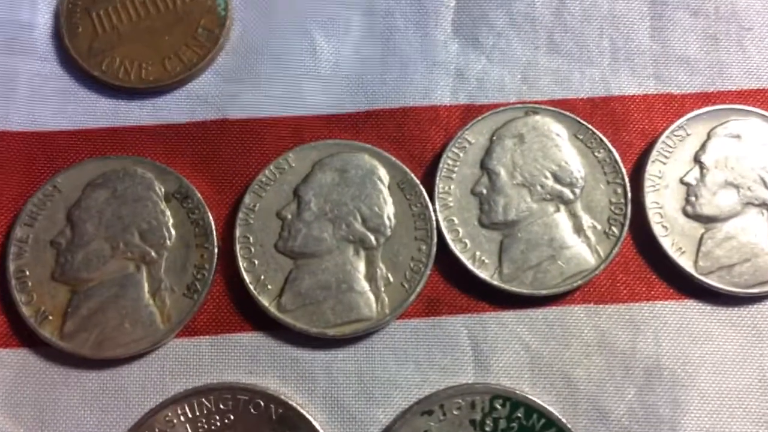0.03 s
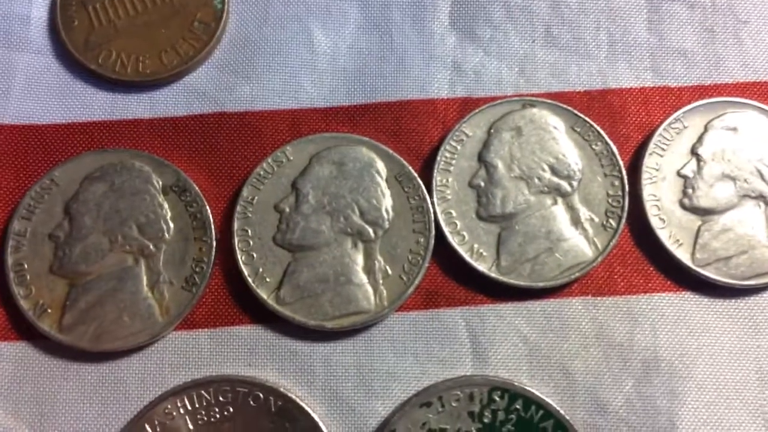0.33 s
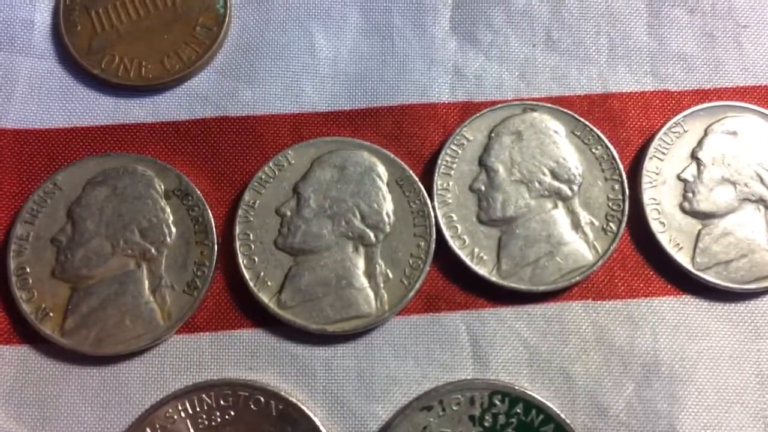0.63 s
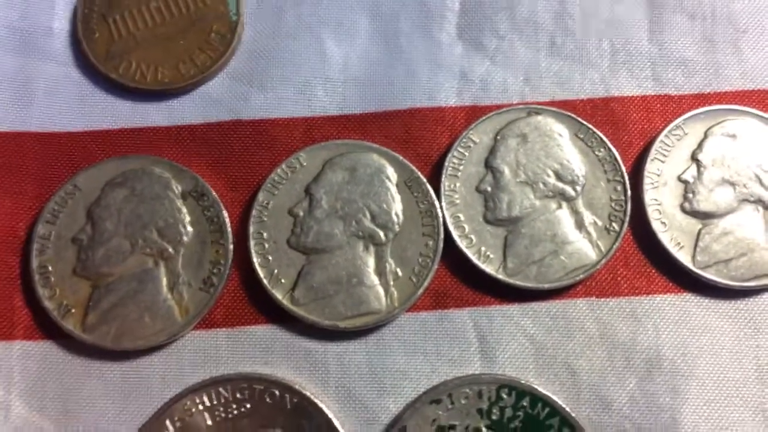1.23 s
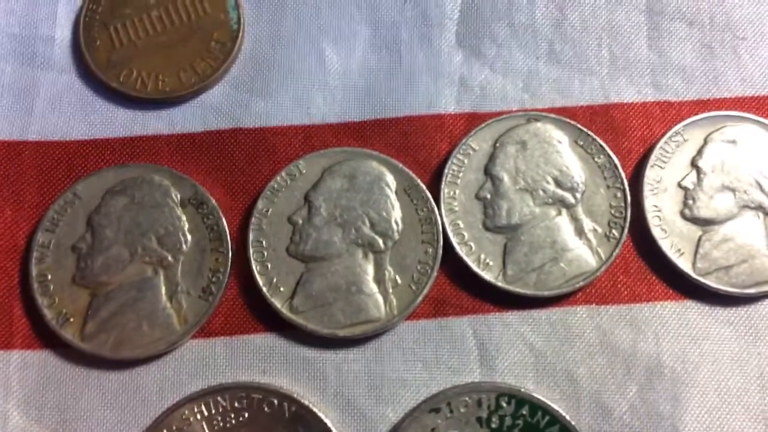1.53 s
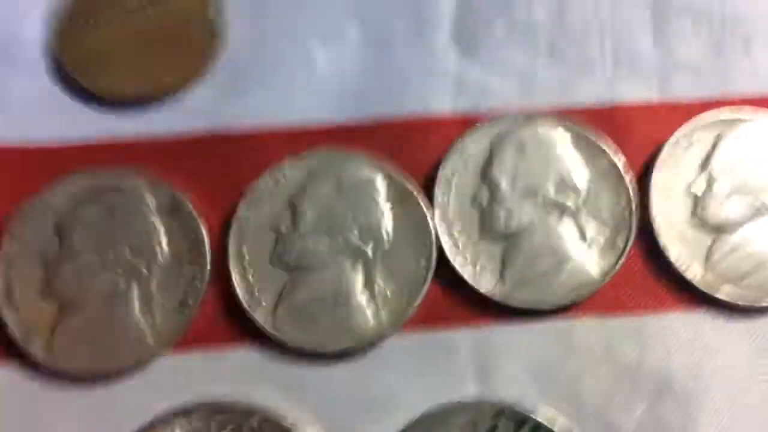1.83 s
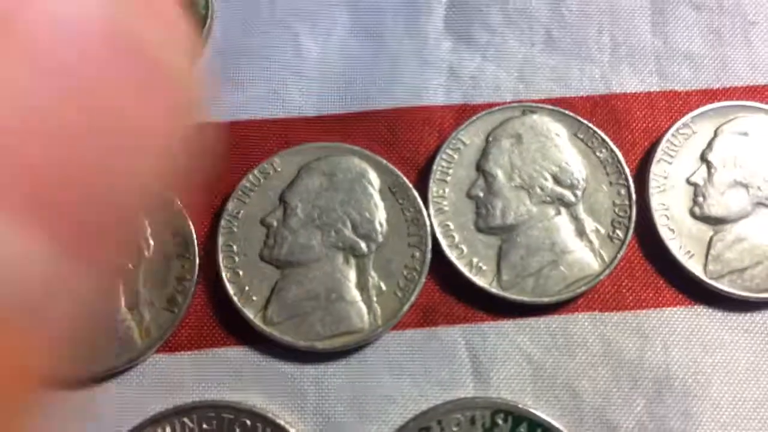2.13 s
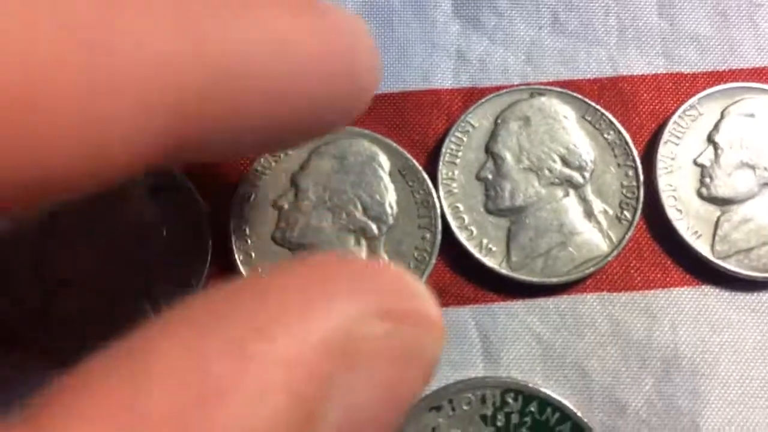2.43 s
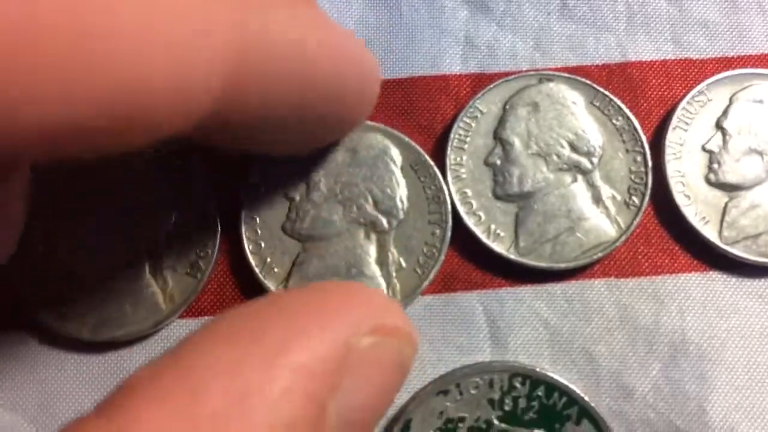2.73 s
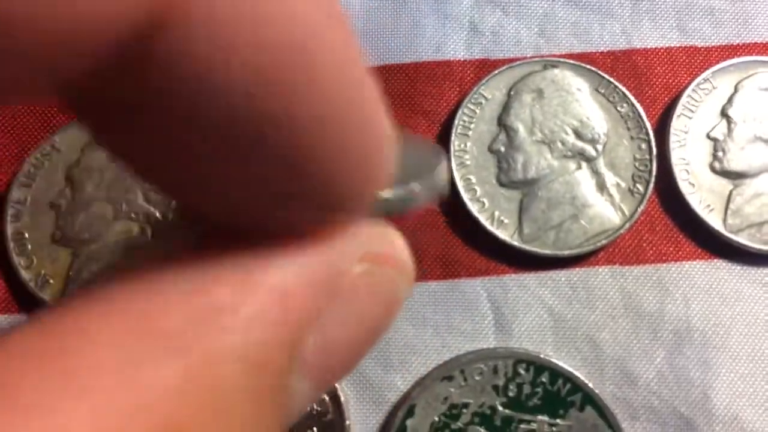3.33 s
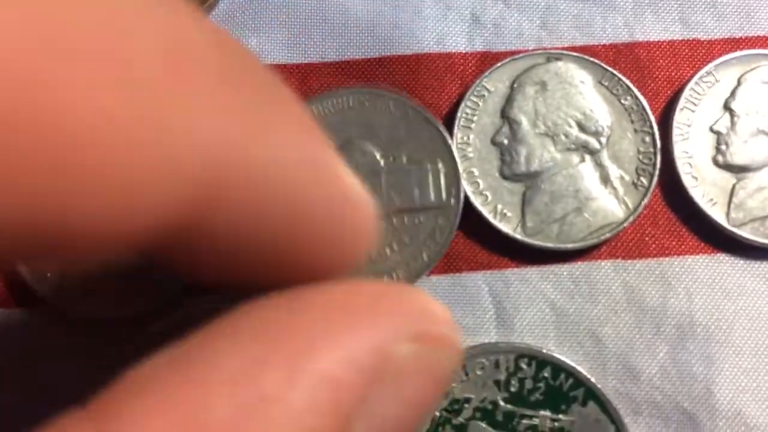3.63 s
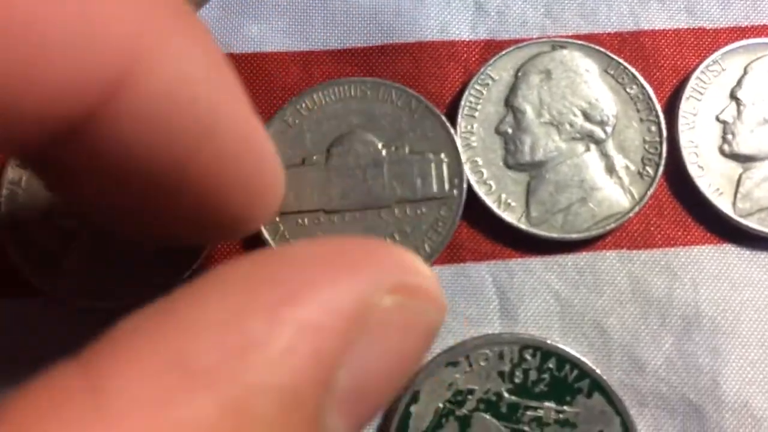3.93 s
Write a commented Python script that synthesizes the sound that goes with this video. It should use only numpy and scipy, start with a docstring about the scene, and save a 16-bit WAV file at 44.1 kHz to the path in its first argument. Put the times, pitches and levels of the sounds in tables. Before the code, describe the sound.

A coin is turned over on cloth, knocking and clicking against another coin.

```python
"""A quiet room hisses and hums while, close by, fingers turn a coin over on a cloth-covered table.
First come a few faint taps of the hand, brushes of skin on cloth and one small metallic ting.
After about 3.3 seconds the coin bumps and drags, and its rim knocks on the table through the cloth.
Then it clicks twice against the next coin, chatters and rings very high. A last faint ting follows."""
import sys
import numpy as np
from scipy import signal
from scipy.fft import rfft, irfft
from scipy.io import wavfile
from scipy.ndimage import uniform_filter1d, minimum_filter1d

SR = 44100
rng = np.random.default_rng(int(sys.argv[2]) if len(sys.argv) > 2 else 0)


def generate_wav(sig):
    """Save sig (samples, or channels by samples) to the path in sys.argv[1] as 16-bit PCM at SR."""
    pcm = np.round(np.clip(np.atleast_2d(sig).T, -1, 1) * 32767).astype(np.int16)
    wavfile.write(sys.argv[1], SR, pcm)


N = 176400
T = np.arange(N) / SR

# The tone of the room's hiss. Each row: frequency in Hz, relative level in dB.
HISS_SPECTRUM = [(20, -34.5), (45, -13), (90, -13), (130, -11), (160, -14.5), (250, -5.5), (330, -6.5),
                 (470, -10.5), (600, -9.5), (800, -9.5), (1120, -10.5), (1500, -17.5), (2050, -21),
                 (3100, -23), (3950, -30.5), (7700, -35.5), (8600, -38), (12000, -41.5), (15200, -52)]
# The hiss sinks a little as the hand covers the coins. Each row: time in seconds, change in dB.
HISS_CHANGE = [(0, -0.1), (.8, -0.14), (1.1, .5), (1.6, 0.5), (2.2, -0.3), (2.75, -0.06), (3.3, 0.5),
               (4, -1.6)]
# The low murmur of the room's air. Each row: time in seconds, level in dB.
MURMUR_LEVEL = [(0, -56.5), (.85, -57), (1.02, -53), (1.42, -49.5), (1.56, -47), (1.70, -51.5), (2.1, -59),
                (2.35, -50.5), (2.75, -59.5), (3.02, -52.5), (3.25, -58), (4, -59.5)]
# The pitches in that murmur. Each row: frequency in Hz, width in Hz, relative level in dB.
MURMUR_BANDS = [(205.2, 17.4, 1.5), (288.4, 38, 0), (353, 31, -11.5), (131.3, 29.3, -11.5)]
# The room's steady drones. Each row: frequency in Hz, width in Hz, level in dB.
DRONE_BANDS = [(208.6, 8.8, -64), (349.8, 17, -64), (512.6, 11, -64), (717.6, 32, -66), (866.7, 20, -64)]
# How the lowest hum swells and fades. Each row: time in seconds, relative level in dB.
HUM_SWELL = [(0, -76), (.35, -75), (.7, -62.5), (1.4, -57.5), (2.0, -60.5), (2.6, -55), (3.1, -58),
             (3.4, -60), (4, -62)]
# Dry taps of the hand. Each row: start in seconds, level in dB, seconds to fade to about a third.
HAND_TAPS = [(0.778, -57.5, 0.0069), (2.392, -58, .005), (3.475, -51.5, 0.0029)]
# The tone of a tap. Each row: frequency in Hz, relative level in dB.
TAP_SPECTRUM = [(500, -11), (3000, -3), (5300, -4), (7500, -7), (15000, -22)]
# Skin brushes cloth and coin. Each row: middle in seconds, half length in seconds, level in dB.
SKIN_BRUSHES = [(1.66, 0.077, -72), (1.801, 0.015, -66), (2.083, 0.013, -66), (3.035, .004, -68),
                (3.33, .018, -70), (3.555, 0.0014, -53), (3.625, .004, -58.5), (3.675, 0.0011, -51)]
# The tone of a brush. Each row: frequency in Hz, relative level in dB.
BRUSH_SPECTRUM = [(500, -17), (3000, 0.5), (5500, -3), (9000, -3), (12500, -5.5), (14400, -10),
                  (15500, -23)]
# Faint metallic tings. Each row: start in seconds, gain in dB.
TING_EVENTS = [(2.408, -56.5), (3.945, -62)]
# A ting's modes, the notes it rings with. Ring time is how long a note takes to fade by 60 dB.
# Each row: frequency in Hz, relative level in dB, ring time in seconds.
TING_MODES = [(3330, 2.5, 0.17), (4300, -7, .09), (7720, -12, .22), (7860, -6, .09)]
# Soft bumps on the table. Each row: middle in seconds, half length in seconds, level in dB.
SOFT_BUMPS = [(3.336, 0.0077, -44), (3.645, .004, -38)]
# The rims rub together. Each row: middle in seconds, half length in seconds, level in dB.
RIM_RUBS = [(3.338, .012, -70), (3.567, .007, -59)]
# The coin drags on cloth. Each row: middle and half length in seconds, level in dB, pitch in Hz.
CLOTH_SCUFFS = [(3.340, 0.0085, -48.5, 730), (3.511, 0.011, -42.5, 330), (3.558, 0.015, -48.5, 653),
                (3.591, 0.0052, -45.5, 600), (3.643, 0.0037, -41.5, 740), (3.662, .006, -52, 760)]
# The rim hits the table. Each row: start in seconds, thud and clatter levels in dB,
# the clatter's centre in Hz, its width in octaves.
RIM_KNOCKS = [(3.476, -21, -39.5, 1397, 0.74), (3.5769, -19.5, -25, 2880, 0.79),
              (3.686, -24.5, -23, 1840, 0.58)]
# The table's notes. Each row: frequency in Hz, relative level in dB, ring time in seconds.
TABLE_MODES = [(265, -11.5, 0.031), (340, -3, 0.031), (528, -5.5, 0.038), (717, 0.5, 0.032),
               (790, -4.5, 0.044), (1067, 1, 0.013), (1320, -3.5, .013), (1790, 1, 0.018)]
# Coin hits coin. Each row: start in seconds, tick level in dB, clack level in dB.
COIN_CLICKS = [(3.5722, -13, -43), (3.5743, -17, -48), (3.5772, -11.5, -19.5), (3.5773, -23.5, 3.5),
               (3.6150, -23, -53), (3.6163, -16, -49.5), (3.6853, -13, -26.5), (3.6867, -2.5, -15),
               (3.6988, -7.5, -30), (3.7001, -22, -50), (3.702, -18, -50.5), (3.7056, -30, -59),
               (3.7080, -26, -59.5), (3.7085, -25, -55), (3.7098, -18.5, -52), (3.712, -23, -58.5)]
# The tone of a tick. Each row: frequency in Hz, relative level in dB.
TICK_SPECTRUM = [(100, -50), (600, -28), (2000, -28), (4100, -23.5), (5100, -11), (6700, -6), (8500, 2.5),
                 (10000, 0), (11300, -5.5), (13000, -3), (15000, -12), (15700, -33.5)]
# The notes of two coins pressed together, of the turned coin (main and lower) and of its neighbour.
# Each row: frequency in Hz, relative level in dB, ring time in seconds.
CLACK_MODES = [(2450, -15, .005), (3260, -13, 0.0056), (4040, -19.5, 0.0045), (5420, -16, .007),
               (7800, -5.5, 0.0055), (8220, -8, 0.005), (9600, -22.5, .004), (12570, -0.5, 0.004),
               (13250, -10.5, .003)]
COIN_MODES = [(13960, -15, .15), (14082, -18, .11), (14160, -8, .36), (14200, -1, .2), (14228, -13, .18)]
COIN_LOW_MODES = [(13605, -19, .07), (13754, -7, .08), (13824, -2, .08)]
NEIGHBOUR_MODES = [(14524, 0, .06), (14470, -12, .04), (14700, -17, .035)]
# The coins ring after a contact. Each row: start, rise time and time left free in seconds,
# then gains in dB for the turned coin's main notes, its lower notes and the neighbour's notes.
FREE_RINGS = [(3.5727, 0.00102, 0.043, -24.5, -26, -36), (3.5800, .006, 0.064, -24, -27, -7),
              (3.6020, .0042, .02, -22, -35, -43), (3.6320, 0.0046, .045, -37, -43, -50),
              (3.6864, 0.0066, 0.012, -8.5, -5.5, -14), (3.7060, .006, .02, -18.5, -35, -40.5),
              (3.7500, .007, 0.012, -32, -52, -61), (3.7800, .006, .3, -50, -64, -70)]
# The tone of the room's echo. Each row: frequency in Hz, level in dB.
ECHO_SPECTRUM = [(200, -9.5), (500, -6.5), (800, -11.5), (3000, -9), (6000, -22.5), (10000, -23.5),
                 (14000, -21.5)]
# How long the echo lasts. Each row: frequency in Hz, ring time in seconds.
ECHO_RING_TIMES = [(200, 0.32), (1000, 0.16), (4000, 0.21), (14000, .13)]


def amp(db):
    """Turns decibels into a number to multiply by."""
    return 10 ** (np.asarray(db) / 20)


def unit(x):
    """Scales a sound to an average power of 1."""
    return x / np.sqrt(np.mean(x ** 2) + 1e-20)


def at_hz(table, hz):
    """Looks up a table by frequency, gliding between its rows."""
    row_hz, value = np.transpose(table)
    return np.interp(np.log(hz + 1), np.log(row_hz + 1), value)


def over_time(table):
    """Joins a table's points into a curve over time."""
    return np.interp(T, *np.transpose(table))


def add(mix, start, sound):
    """Mixes a sound in at a start time in seconds."""
    part = mix[round(start * SR):][:len(sound)]
    part += sound[:len(part)]


def noise(gain, size=N):
    """Noise whose tone is shaped by gain(hz)."""
    hz = np.fft.rfftfreq(size, 1 / SR)
    return unit(irfft(rfft(rng.standard_normal(size)) * gain(hz), size))


def hill(distance, steepness=2):
    """A curve that is 1 at distance 0 and one half at distance 1."""
    return 1 / (1 + distance ** steepness)


def swells(table):
    """A smooth rise and fall for each row."""
    return sum(amp(db) * np.exp(-.5 * ((T - middle) / half) ** 2) for middle, half, db in table)


def modes(table):
    """A struck object rings as a sum of fading pure tones."""
    t = T[:SR // 2]
    return sum(amp(db) * np.exp(-np.log(1000) * t / ring_s) * np.sin(2 * np.pi * hz * t)
               for hz, db, ring_s in table)


def cut_bass(x, hz):
    """Weakens everything below hz."""
    return signal.sosfilt(signal.butter(2, hz, "high", fs=SR, output="sos"), x)


def room_noise(hiss_db=-50.5, waver_db=0.12, hum_hz=72.2, drift_hz=0.56, mains_hz=119.6, mains_db=-67):
    """The room's air hisses, murmurs and drones over a drifting hum and a steady electrical one."""
    def wander():
        return np.interp(T, np.linspace(0, T[-1], num=32), rng.standard_normal(32))
    def bands(table):
        return noise(lambda hz: sum(amp(db) / np.sqrt(width) * hill(2 * (hz - centre) / width)
                                    for centre, width, db in table))
    hiss_gain = amp(hiss_db + waver_db * wander() + over_time(HISS_CHANGE))
    hiss = hiss_gain * noise(lambda hz: amp(at_hz(HISS_SPECTRUM, hz)))
    murmur = amp(over_time(MURMUR_LEVEL)) * bands(MURMUR_BANDS)
    drones = np.linalg.norm([amp(db) for _, _, db in DRONE_BANDS]) * bands(DRONE_BANDS)
    hum_phase = 2 * np.pi * np.cumsum(hum_hz + drift_hz * wander()) / SR
    hum = amp(over_time(HUM_SWELL) - 2.5) * unit(np.sin(hum_phase))
    mains = amp(mains_db) * unit(np.sin(2 * np.pi * mains_hz * T))
    return hiss + murmur + drones + hum + mains


def taps():
    """Each tap of the hand is a burst of noise that dies at once."""
    out, t = np.zeros(N), T[:SR // 10]
    for start, db, fade_s in HAND_TAPS:
        burst = noise(lambda hz: amp(at_hz(TAP_SPECTRUM, hz)), size=len(t))
        add(out, start, amp(db) * np.exp(-t / fade_s) * burst)
    return out


def brushes():
    """Skin hisses as it slides over cloth and coin."""
    return swells(SKIN_BRUSHES) * noise(lambda hz: amp(at_hz(BRUSH_SPECTRUM, hz)))


def tings(rise_s=0.005):
    """Metal rings faintly, with a soft start."""
    out, ting = np.zeros(N), np.minimum(T[:SR // 2] / rise_s, 1) * modes(TING_MODES)
    for start, db in TING_EVENTS:
        add(out, start, amp(db) * ting)
    return out


def bumps(table_hz=710):
    """Soft bumps of finger and coin wake only the table's main note."""
    return swells(SOFT_BUMPS) * np.sin(2 * np.pi * table_hz * T)


def rubs(pitch_hz=14300, half_width_hz=350):
    """The rims rub and the coin sings faintly."""
    return swells(RIM_RUBS) * noise(lambda hz: hill((hz - pitch_hz) / half_width_hz))


def scuffs(width_octaves=0.4):
    """The coin's face drags on the cloth and the table murmurs under it."""
    out, t = np.zeros(N), T[:SR // 10] - 1 / 20  # t is 0 in the middle of a scuff
    for middle, half, db, pitch in CLOTH_SCUFFS:
        murmur = noise(lambda hz: hill(np.log2((hz + 1) / pitch) / width_octaves), size=len(t))
        add(out, middle + t[0], amp(db) * np.exp(-.5 * (t / half) ** 2) * murmur)
    return out


def knocks(contact_s=0.00035, clatter_rise_s=0.0027, clatter_ring_s=0.02):
    """The rim knocks on the table: its low notes thud and its many high notes clatter briefly."""
    out, t = np.zeros(N), T[:SR // 10]
    push = np.exp(-t / contact_s) * np.cos(np.pi * t / (2 * contact_s))
    thud = cut_bass(signal.fftconvolve(modes(TABLE_MODES), push), hz=260)
    fade = np.minimum(t / clatter_rise_s, 1) * np.exp(-np.log(1000) * t / clatter_ring_s)
    for start, thud_db, clatter_db, centre, width in RIM_KNOCKS:
        clatter = noise(lambda hz: hill(np.log2((hz + 1) / centre) / width, steepness=4), size=len(t))
        add(out, start, amp(thud_db) * thud / abs(thud).max())
        add(out, start, amp(clatter_db) * fade * clatter)
    return out


def clicks(size=2048):
    """Rim meets rim: a bright tick and, on a hard hit, a short clack."""
    log_gain = np.log(amp(at_hz(TICK_SPECTRUM, abs(np.fft.fftfreq(size, 1 / SR)))))
    # Build the most sudden click that has this tone.
    tick = np.fft.ifft(np.exp(np.conj(signal.hilbert(log_gain)))).real[:size // 2]
    clack = cut_bass(modes(CLACK_MODES), hz=4170)  # a small disc gives off little bass
    out = np.zeros(N)
    for start, tick_db, clack_db in COIN_CLICKS:
        add(out, start, amp(tick_db) * tick / abs(tick).max())
        add(out, start, amp(clack_db) * clack / abs(clack).max())
    return out


def rings(choke_db_per_s=1595):
    """Both coins ring and shimmer as they come free, until a finger or the cloth stops them."""
    out, t = np.zeros(N), T[:SR // 2]
    coin, coin_low, neighbour = modes(COIN_MODES), modes(COIN_LOW_MODES), modes(NEIGHBOUR_MODES)
    for start, rise_s, free_s, coin_db, low_db, neighbour_db in FREE_RINGS:
        ringing = amp(coin_db) * coin + amp(low_db) * coin_low + amp(neighbour_db) * neighbour
        choke = amp(-choke_db_per_s * np.maximum(t - free_s, 0))
        add(out, start, np.minimum(t / rise_s, 1) * choke * ringing)
    return out


def echo(sound, rise_s=0.0048):
    """A small furnished room blurs its many reflections into a short tail."""
    hz, t, spectrum = signal.stft(rng.standard_normal(SR // 2), SR, nperseg=256)
    ring_s = at_hz(ECHO_RING_TIMES, hz)[:, None]
    gain = amp(at_hz(ECHO_SPECTRUM, hz))[:, None] * np.sqrt(2 * np.log(1000) / (ring_s * SR))
    fade = np.exp(-np.log(1000) * t / ring_s)
    tail = signal.istft(spectrum * gain * fade, SR, nperseg=256)[1]
    tail *= np.minimum(T[:len(tail)] / rise_s, 1)
    return signal.fftconvolve(sound, tail)[:N]


def scene():
    """Hand, coins and table, with their echo and the room's own noise."""
    near = taps() + brushes() + tings() + bumps() + rubs() + scuffs() + knocks() + clicks() + rings()
    return (near + echo(near) + room_noise())[None]


def record(dry, dip_db=1, above_db=-37, recover_db_per_s=2, ceiling=0.72, top_hz=15800):
    """The volume dips a little after loud clicks, sharp peaks are softened, the top treble is cut."""
    power_db = 10 * np.log10(abs(uniform_filter1d(dry[0] ** 2, size=220)) + 1e-12)
    over_db = np.clip(power_db - above_db, 0, dip_db)
    recovery_db = T * recover_db_per_s
    held_db = np.maximum.accumulate(over_db + recovery_db) - recovery_db  # dip fast, come back slowly
    dipped = dry[0] / amp(uniform_filter1d(held_db, size=200))
    peak_gain = ceiling / np.maximum(abs(dipped), ceiling)
    smooth_gain = uniform_filter1d(minimum_filter1d(peak_gain, size=31), size=21)
    treble_cut = signal.firwin(255, top_hz, window=("kaiser", 9), fs=SR)
    return signal.oaconvolve(dipped * smooth_gain, treble_cut, "same")[None]


dry = scene()
out = record(dry)
generate_wav(out)
```